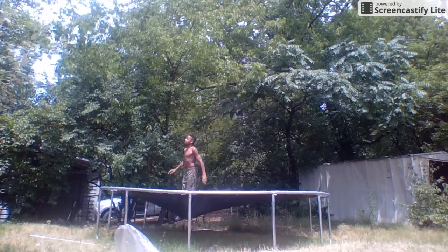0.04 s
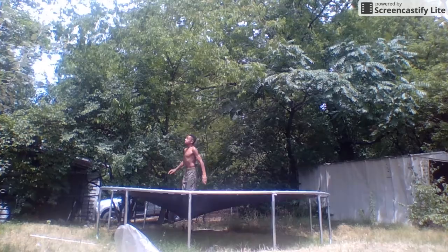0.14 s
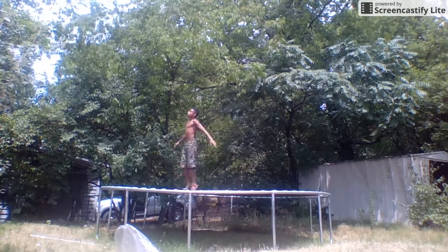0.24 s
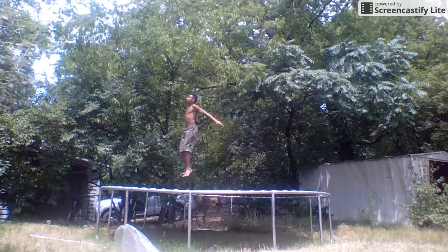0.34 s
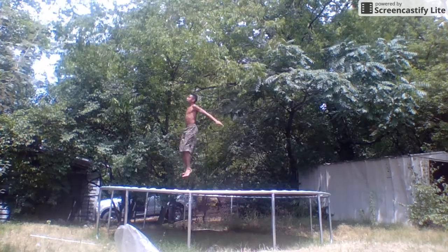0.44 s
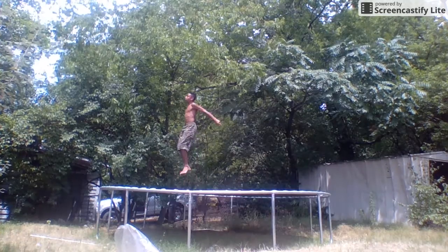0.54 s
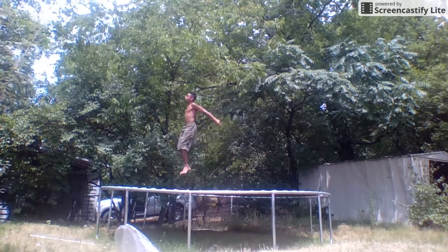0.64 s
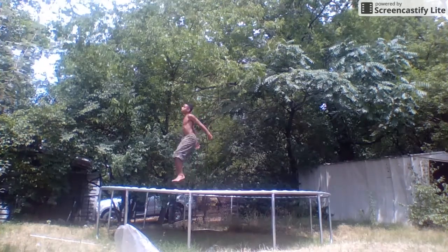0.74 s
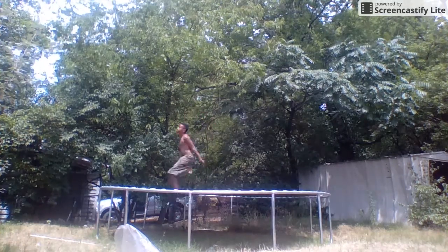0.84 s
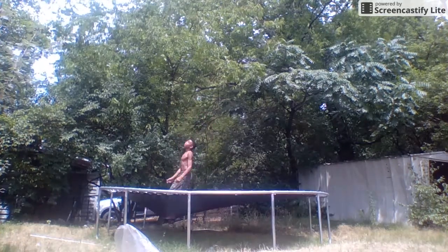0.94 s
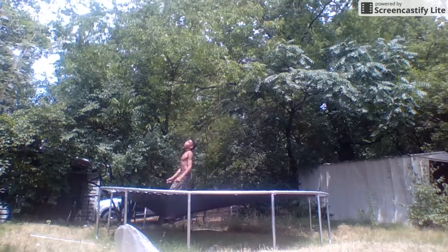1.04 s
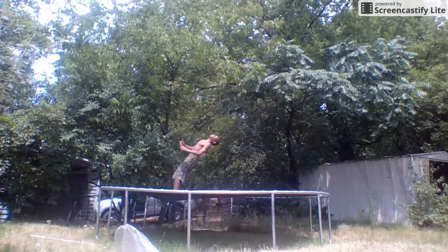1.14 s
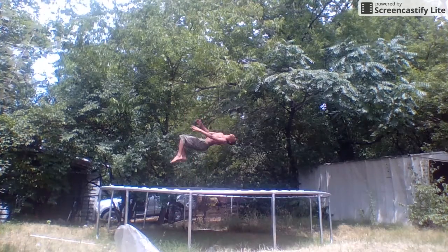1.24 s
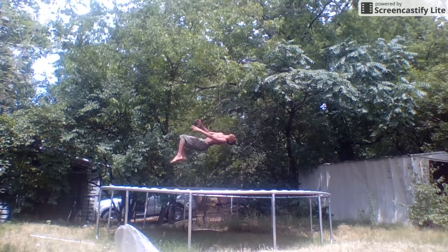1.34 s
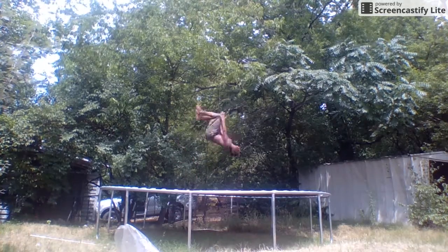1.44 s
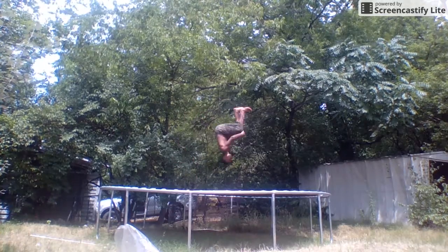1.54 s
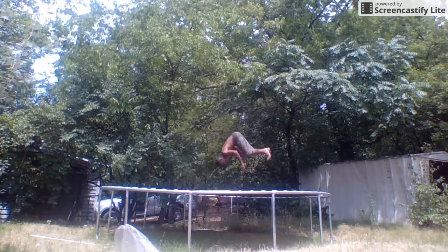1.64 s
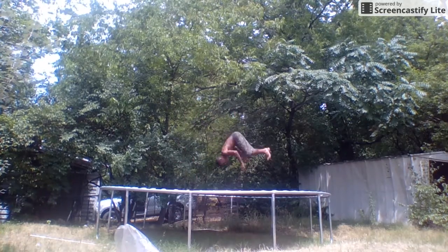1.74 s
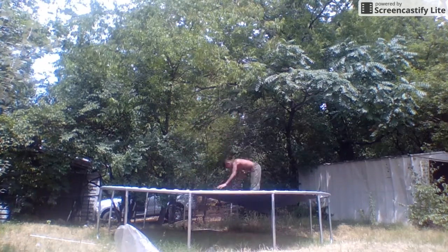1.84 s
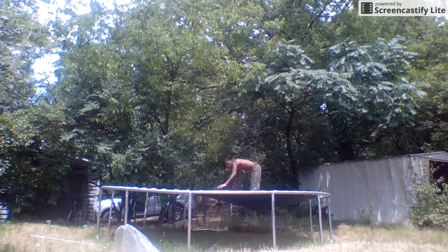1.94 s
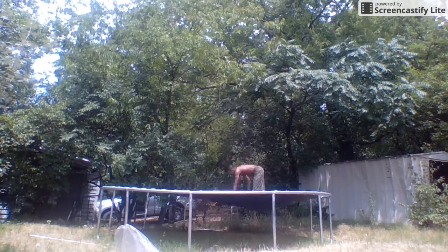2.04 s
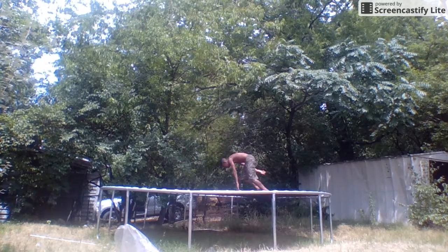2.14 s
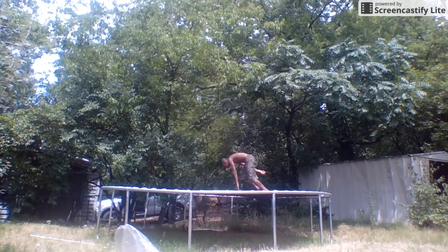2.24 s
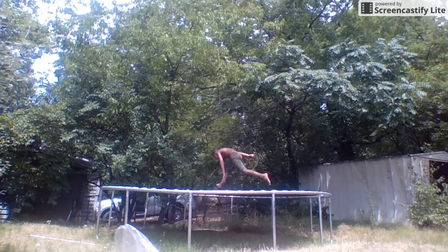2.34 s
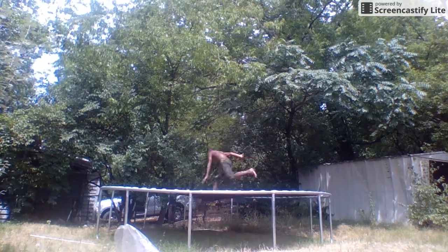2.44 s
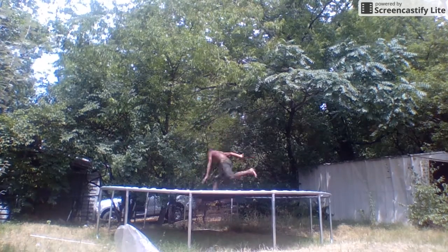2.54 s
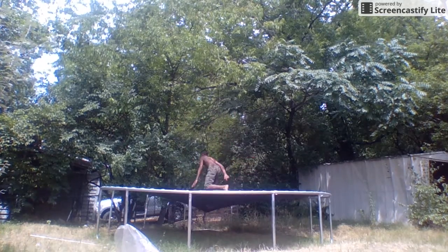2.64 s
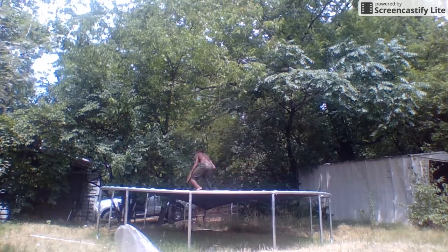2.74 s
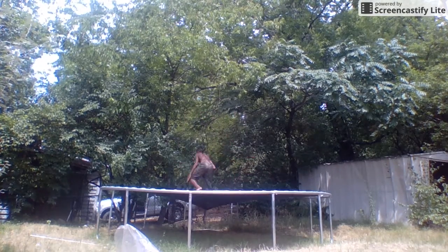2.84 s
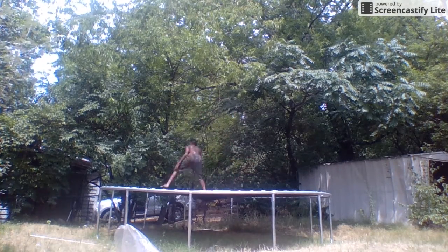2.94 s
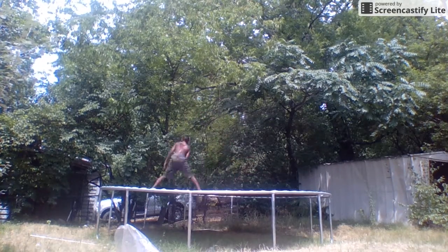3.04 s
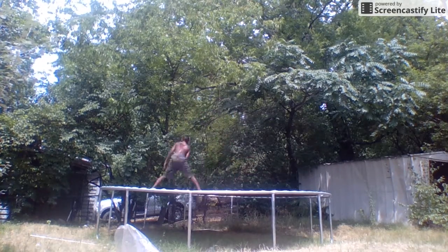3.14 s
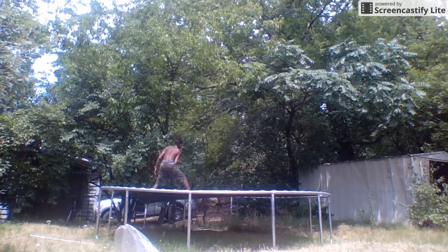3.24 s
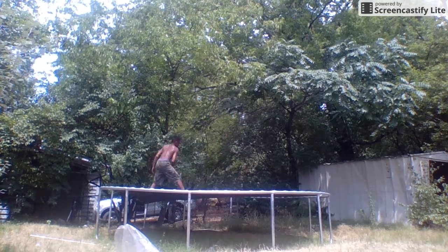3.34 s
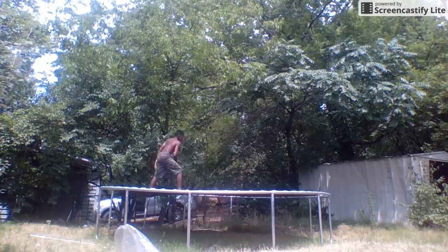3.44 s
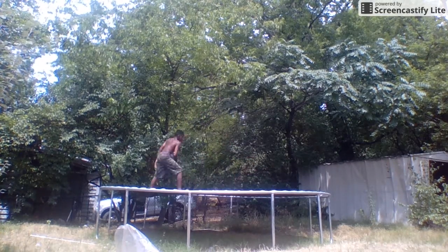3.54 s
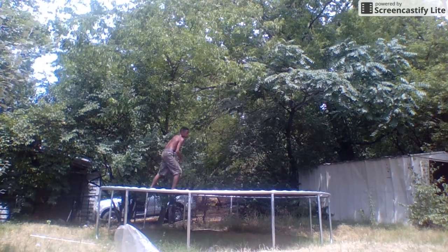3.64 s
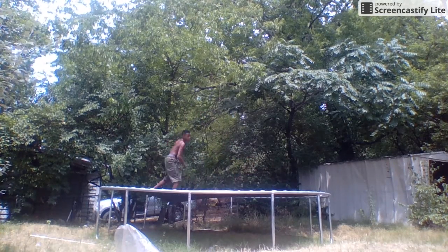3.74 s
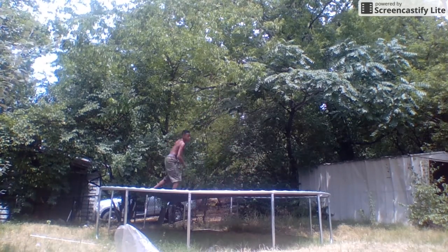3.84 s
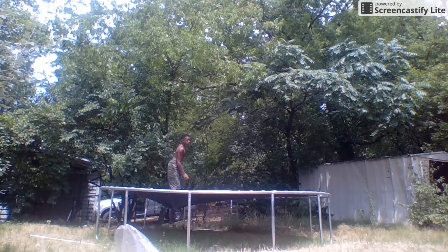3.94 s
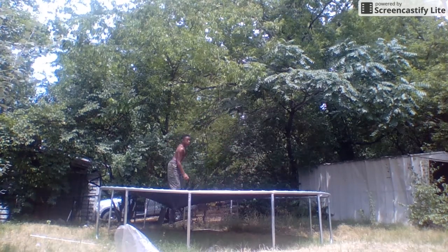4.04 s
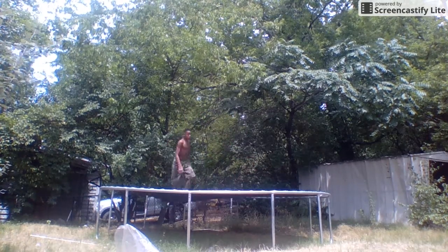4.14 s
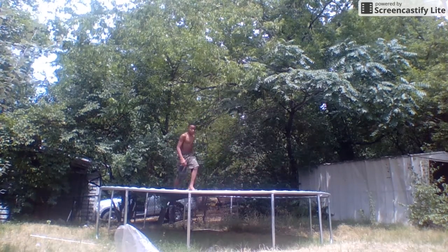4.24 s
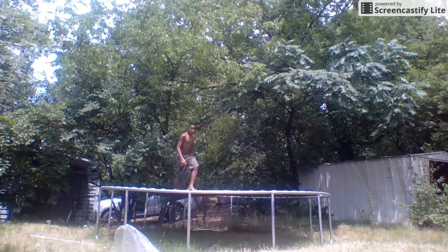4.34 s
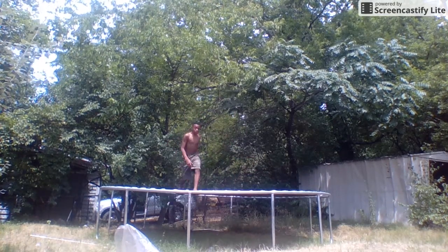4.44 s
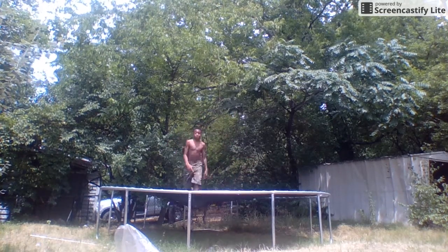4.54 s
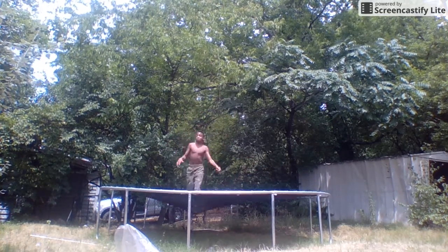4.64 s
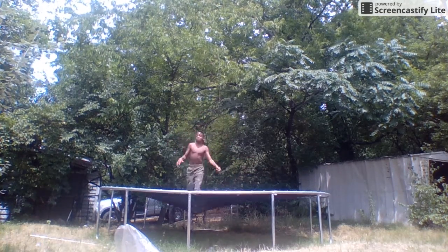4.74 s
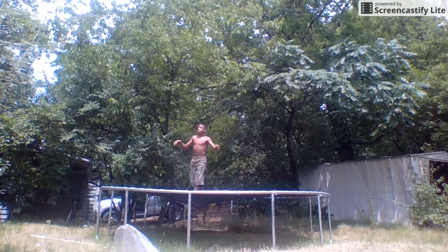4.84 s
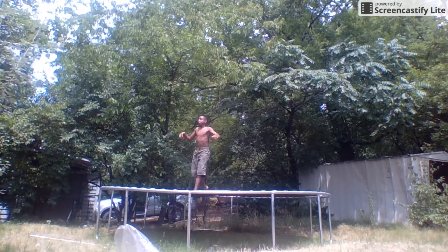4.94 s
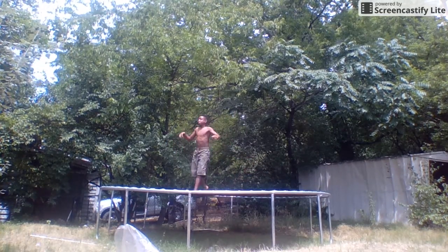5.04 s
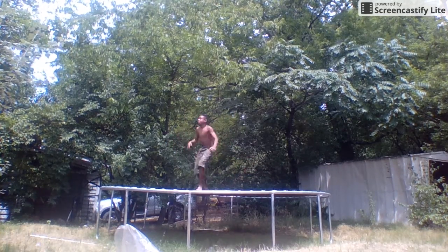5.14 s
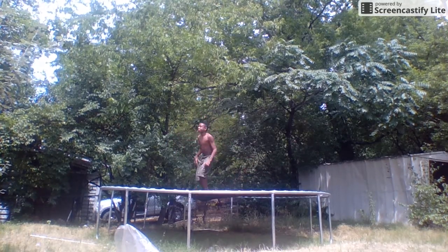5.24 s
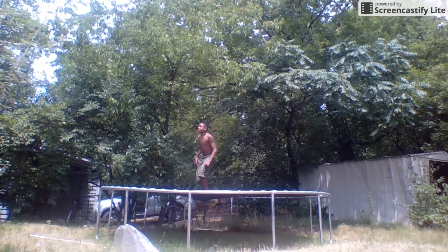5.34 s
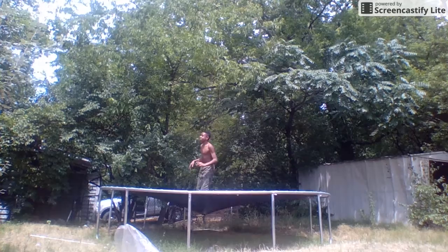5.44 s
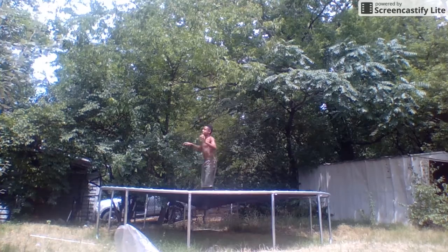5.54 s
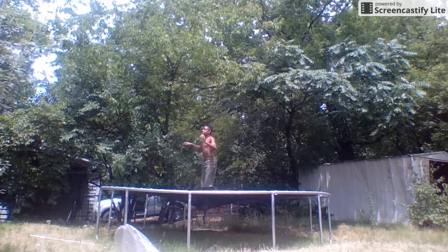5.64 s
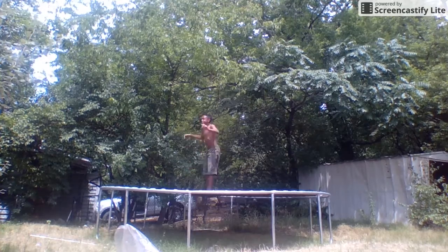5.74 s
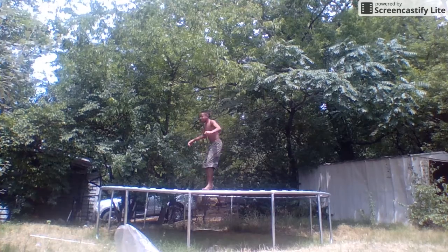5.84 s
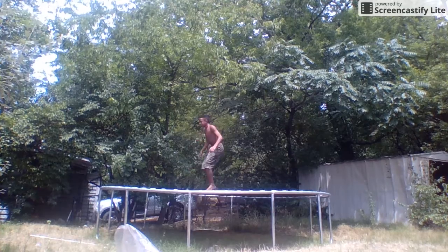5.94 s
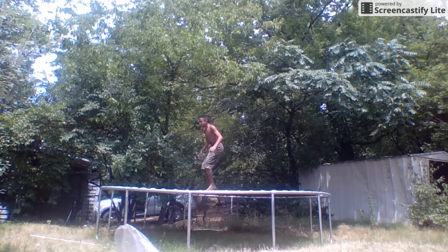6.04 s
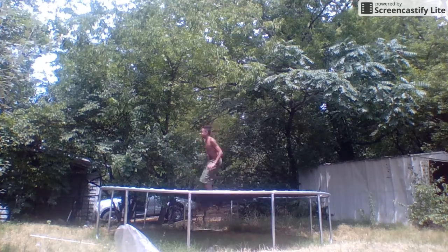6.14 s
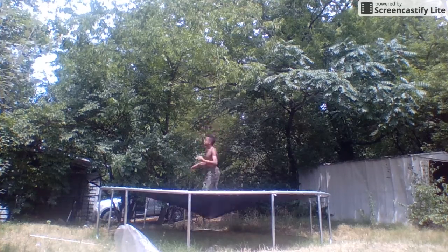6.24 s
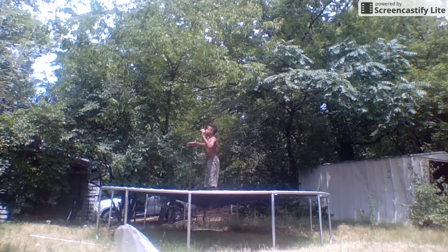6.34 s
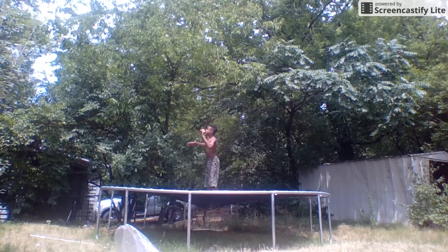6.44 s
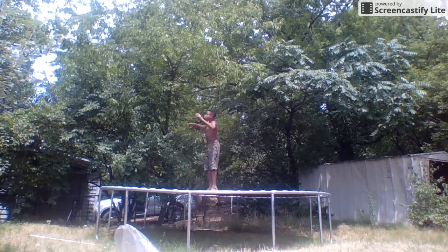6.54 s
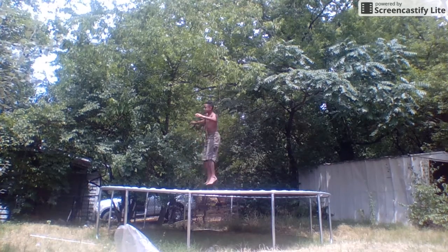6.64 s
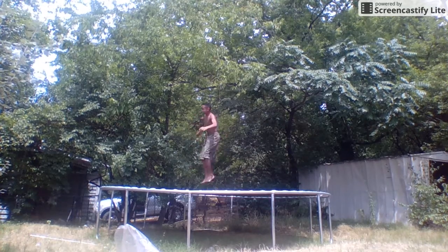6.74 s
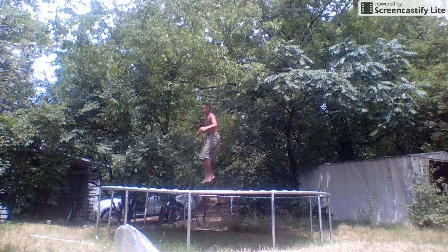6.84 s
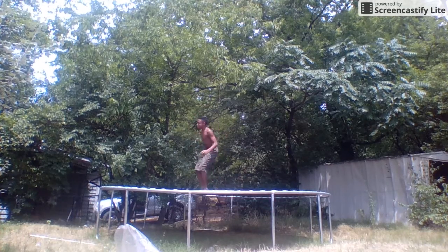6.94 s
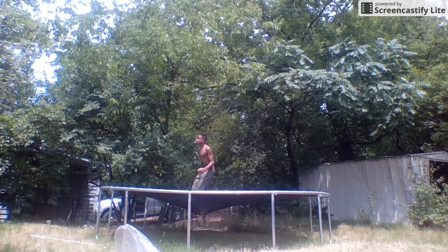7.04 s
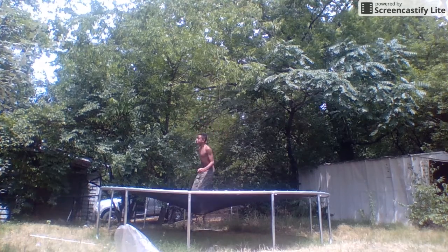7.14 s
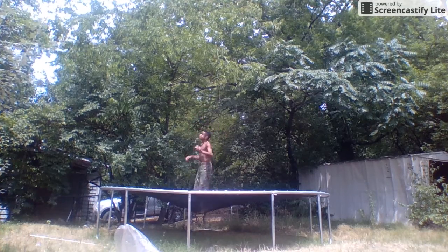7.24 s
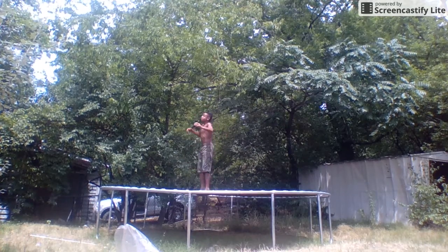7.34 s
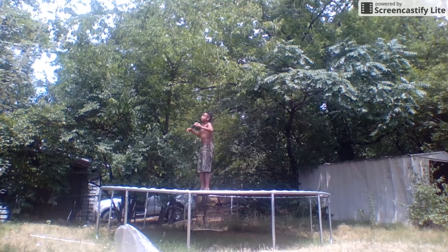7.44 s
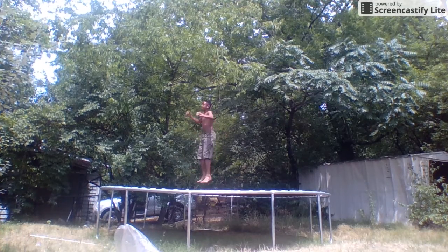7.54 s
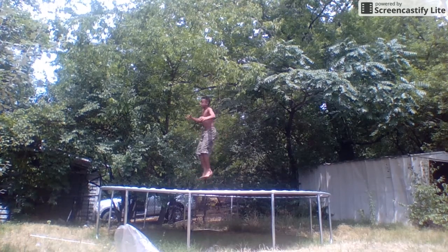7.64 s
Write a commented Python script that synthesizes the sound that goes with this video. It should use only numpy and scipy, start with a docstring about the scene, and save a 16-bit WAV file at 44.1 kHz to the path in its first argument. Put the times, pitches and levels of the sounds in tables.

```python
"""A jumper bounces on a garden trampoline, heard from across the lawn through one bright microphone.
Each landing and take-off drags the mat and stretches the springs: random clicks make a dense rasp and a crunch,
and set tuned modes ringing as coils that chatter on in flight and a steel frame. Hooks creak in pairs of tones.
Below lie low thuds of the mat over light wind, distant traffic and a flatter murmur of leaves, all made from
coloured noise; faint wavering tones colour the murmur."""
import sys
import numpy as np
from scipy import signal
from scipy.fft import rfft, irfft, next_fast_len
from scipy.io import wavfile

SR = 44100
rng = np.random.default_rng(int(sys.argv[2]) if len(sys.argv) > 2 else 0)


def file_out(sig):
    """Save sig as 16-bit WAV at sys.argv[1]."""
    # one column per channel
    cols = np.atleast_2d(sig).T
    # limit, then scale
    lim = np.clip(cols, -1, 1)
    pcm = np.round(lim * 32767).astype(np.int16)
    wavfile.write(sys.argv[1], SR, pcm)


N = 338670   # length in samples
STEP = 40   # slow curves are worked out once in this many samples

# each stretch or recoil of the mat: peak t/s, rasp level/dB, rise/s, fall/s,
# then against the rasp: coil chatter/dB, rim ring/dB, leg scrape/dB
MAT_STROKES = [(0.023, -11, 0.21, 0.11, -5.1, -14, -20.5), (0.232, -14.5, 0.09, 0.13, -6.5, -15, -24),
               (1.007, -8.5, 0.092, 0.12, -6, -14, -24), (1.155, -16.0, 0.06, 0.15, -5.5, -16, -23.5),
               (1.348, -24, 0.075, 0.1, -5, -17, -29), (1.924, -14.3, 0.058, 0.12, -4.5, -20, -19),
               (1.984, -11.5, 0.065, 0.077, -6.5, -12.5, -27), (2.068, -19, 0.073, 0.1, -11, -15, -35),
               (2.156, -17, 0.14, 0.25, -6.5, -16, -23), (2.49, -25, 0.045, 0.13, -7, -20.7, -18),
               (2.617, -17.5, 0.069, 0.15, -7, -18.5, -25.1), (3.019, -33.0, 0.079, 0.15, -4, -21, -16),
               (3.295, -16.5, 0.11, 0.14, -6, -15.5, -16), (3.598, -49.5, 0.07, 0.077, -5, -13, -16),
               (3.688, -43, 0.054, 0.07, -7, -26, -21), (3.983, -34.5, 0.129, 0.094, -3, -10.5, -15),
               (4.269, -51.5, 0.045, 0.099, -11, -21, -9), (4.485, -35.5, 0.09, 0.23, -4.5, -15.5, -21),
               (4.7, -14, 0.082, 0.11, -9, -15.5, -18), (4.895, -33.5, 0.059, 0.14, -6, -13, -14),
               (5.02, -22.5, 0.073, 0.13, -7.5, -22.5, -25.5), (5.223, -41, 0.04, 0.046, -7, -18, -15.6),
               (5.311, -45.5, 0.053, 0.1, -4, -13, -13), (5.462, -13.5, 0.072, 0.105, -7, -16.5, -16.5),
               (5.742, -18, 0.083, 0.14, -9.5, -20, -22.5), (5.902, -37, 0.056, 0.082, -13, -13, -15.1),
               (6.013, -34, 0.044, 0.052, -11.5, -19, -20), (6.107, -54, 0.092, 0.085, -11, -12.1, -14),
               (6.259, -11, 0.071, 0.11, -7.5, -20.5, -19), (6.508, -16.5, 0.069, 0.14, -7, -21, -23.5),
               (6.744, -42.2, 0.059, 0.13, -7, -14, -15), (6.812, -38.5, 0.085, 0.1, -5.5, -14.5, -20),
               (7.055, -50, 0.055, 0.117, -4, -13, -11), (7.144, -10.5, 0.056, 0.14, -7, -24, -17.5),
               (7.191, -11.5, 0.034, 0.058, -7, -18.0, -16), (7.395, -15, 0.055, 0.13, -7.5, -18, -20),
               (7.709, -25.5, 0.089, 0.12, -9.5, -23.6, -23.5)]
# springs left shivering between strokes: t/s, rasp level/dB,
# then against the rasp: coil chatter/dB, rim ring/dB, leg scrape/dB
SPRING_SHIVER = [(0.3, -20.5, -6.5, -29, -35), (0.9, -25.5, -7.5, -44, -48), (1.3, -26, -7.0, -16.7, -33),
                 (1.74, -32, -7.0, -32, -35), (2.8, -30, -9, -24.5, -24.5), (3.41, -32, -8, -20, -29),
                 (3.51, -41, -10, -13, -19), (4.05, -56, -5, -7, -11.5), (4.18, -71.5, -7.5, -7, -6),
                 (4.35, -43.5, -9, -27, -16), (4.9, -38.5, -10, -6.5, -11), (5.3, -49.5, -8, -8, -14.9),
                 (5.9, -45, -9, -11, -18), (6.15, -58, -3, -8.0, -10), (6.6, -36, -10, -2, -16),
                 (6.97, -68, -9.5, -8.0, -11), (7.3, -41, -8, -6, -20), (7.68, -39.5, -8, -23, -20)]
# colour of the fine rasp of weave and coils: f/Hz, relative level/dB
RASP_COLOUR = [(2000, -60), (5500, -34), (7200, -13), (8300, -10), (10500, -7), (11400, -5), (12100, 1),
               (13500, -2), (15200, -5), (16000, -10)]
# colour of the crunch of a hard stretch: f/Hz, relative level/dB
CRUNCH_COLOUR = [(400, -42), (900, -17.5), (1500, -14), (2000, -11), (3300, -0.5), (5000, -2), (6400, 1),
                 (7500, -3.5), (9000, -22)]
# modes (ringing tones) that all springs share: f/Hz, relative level/dB, time to fall 60 dB/s,
# scatter of the copies to either side (share of f)
SPRING_MODES = [(3066, -3, 0.095, 0.039), (3334, -7.5, 0.24, 0.0377), (3594, 0.5, 0.13, 0.043),
                (4036, 0, 0.13, 0.0365), (4487, -5, 0.1, 0.0496), (4910, -3, 0.16, 0.0234),
                (5320, 1, 0.086, 0.0385), (5790, 0.5, 0.084, 0.0363), (6323, 5.5, 0.14, 0.0226),
                (6540, 1, 0.088, 0.0182), (6820, 1.5, 0.26, 0.0286), (7470, -5, 0.13, .04),
                (11960, -1.5, 0.16, 0.0216), (12010, 0.5, 0.087, 0.0298)]
# free shivering favours other spring modes than a stretch does: added to each mode/dB
SHIVER_FAVOURS_DB = [-0.5, -2.5, -3, 2, 8, 7, 0, 1.5, -7, -7.5, 2.5, -7, -1, -2.5]
# modes of the steel rim: f/Hz, relative level/dB, time to fall 60 dB/s, scatter (share of f)
RIM_MODES = [(2150, -4.5, 0.12, 0.033), (2270, -3.5, 0.28, 0.0359), (2535, -1, 0.18, 0.0442),
             (2807, -8, 0.084, 0.0336)]
# modes of the steel legs: f/Hz, relative level/dB, time to fall 60 dB/s, scatter (share of f)
LEG_MODES = [(870, -15, 0.17, 0.073), (1196, -7, 0.079, 0.104), (1459, -4.5, 0.082, 0.058),
             (1605, -3, 0.17, 0.045), (1802, -2.5, 0.1, 0.046)]
# single hooks and springs that sing out: t/s, level/dB, f/Hz, length/s
HOOK_CREAKS = [(0.208, -36, 866, 0.053), (0.41, -40, 2130, 0.064), (0.693, -38.5, 4960, 0.22),
               (1.111, -36, 870, 0.088), (1.233, -46, 2210, 0.31), (1.75, -49, 4940, 0.13),
               (2.347, -44, 4870, 0.15), (2.364, -43, 3670, 0.062), (2.694, -41, 2600, 0.057),
               (2.996, -45, 4860, 0.28), (3.183, -51, 2150, 0.053), (4.658, -28, 4050, 0.087),
               (4.845, -48, 4250, 0.07), (4.92, -41.5, 4010, 0.087), (5.366, -44, 1615, 0.1),
               (5.634, -52, 4350, 0.05), (5.678, -38, 1640, 0.14), (5.855, -46, 6480, 0.087),
               (6.17, -33, 1603, 0.08), (6.19, -45, 2220, 0.1), (6.45, -38, 1580, 0.17),
               (6.482, -36, 848, 0.07), (6.862, -42, 800, 0.09), (7.02, -41.5, 792, 0.19),
               (7.237, -38, 6620, 0.048), (7.317, -41, 2120, 0.17), (7.323, -38, 1550, 0.12),
               (7.458, -40, 2230, 0.07), (7.555, -49, 2270, 0.096)]
# surroundings: t/s, low thuds and wind level/dB, traffic drone level/dB, murmur of leaves level/dB
YARD_LEVELS = [(0.0, -58, -43.5, -53), (0.66, -57.5, -49, -52), (3.23, -52, -50, -54),
               (3.44, -47.5, -48, -52), (3.68, -53, -55, -55), (5.8, -58, -52.5, -53.5),
               (6.25, -46, -51.5, -52.5), (6.91, -64, -45, -55.5), (7.25, -44.5, -44.5, -49.5),
               (7.68, -53, -48, -52)]
# the low end swells briefly: onset t/s, low thuds level/dB, drone level/dB
LOW_BUMPS = [(.463, -55, -43), (1.02, -49, -54), (1.953, -40.5, -45), (2.65, -46, -46), (3.264, -43, -47),
             (4.0, -48, -56), (4.377, -42, -52.5), (4.755, -50, -49), (4.96, -46.5, -51), (5.636, -52, -49),
             (5.8, -49, -51), (6.06, -42.5, -46.5), (6.656, -42, -42), (6.816, -55, -45),
             (7.091, -50, -40.5), (7.401, -47, -36.5), (7.6, -39.5, -41)]
# colour of the low thuds of the mat and the light wind: f/Hz, relative level/dB
THUD_COLOUR = [(12, -35), (25, -12), (60, 0.5), (85, 0.5), (110, -22), (300, -75)]
# colour of the traffic drone: f/Hz, relative level/dB
DRONE_COLOUR = [(60, -48), (95, -7.5), (134, 0), (165, -6.5), (250, -12.5), (400, -32.5), (600, -52.5)]
# colour of the murmur of leaves: f/Hz, relative level/dB
MURMUR_COLOUR = [(200, -3), (350, -3), (600, -0.5), (900, 1), (1400, -5), (2000, -8), (4000, -18.5),
                 (12000, -16), (16000, -32.5)]
# faint wavering tones in the murmur: f/Hz, relative level/dB, time to fall 60 dB/s, scatter (share of f)
WARBLE_MODES = [(279.2, 1, 0.19, 0.198), (480.4, 0, 0.13, 0.255), (804, 1, 0.12, 0.195),
                (1133, -0.5, 0.11, 0.157)]

SWELL_DB = 20   # a lone swell lies this far under its peak one rise before and one fall after it
RISE_POWER, FALL_POWER = 2.53, 2.04   # how squarely a swell rises and falls
RIM_LINGERS, LEGS_LINGER = 1.19, 0.8   # their fall as a multiple of the stroke's
HELD = 0.63   # share of the level in dB that acts by damping the ringing; the rest sets how hard it is struck
SPELL_S = 0.12   # how long a mode stays equally busy
BUMP_DELAY_S, BUMP_RISE_S, BUMP_FALL_S = 0.023, 0.049, 0.13   # onset to peak, then the swell's two sides
CUTOFF_HZ = 15930   # top of the microphone's sound


def trampoline():
    """One motion drives the rasp, the coils and the frame; hard stretches bury the ringing in crunch."""
    rasp_db, coil_db, rim_db, legs_db, shiver_share = motion()
    rasp = from_db(rasp_db + 1.0 * drift(40.0)) * coloured(grains(14000.0, 1.4), RASP_COLOUR)
    # crunch grows faster than the chatter as the rasp gets louder
    hardness_db = 0.25 * (rasp_db + 12)
    crunch = from_db(coil_db + hardness_db - 2.5) * coloured(grains(5000.0, 1.8), CRUNCH_COLOUR)
    chatter = struck(SPRING_MODES, coil_db, 12000.0, 3.0, family_db=3.0, single_db=3.5, count=7,
                     favours_db=SHIVER_FAVOURS_DB, share=shiver_share)
    rim = struck(RIM_MODES, rim_db, 3000.0, 2.3, family_db=5.0, single_db=4.0, count=8)
    legs = struck(LEG_MODES, legs_db, 3000.0, 2.9, family_db=5.5, single_db=3.0, count=6)
    return rasp + crunch + chatter + rim + legs


def motion():
    """Levels of rasp, coils, rim and legs as strokes ride over the shiver; and the shiver's share of the coils."""
    shiver_db, coil_db, rim_db, legs_db = in_time(SPRING_SHIVER)
    peak_s, stroke_db, rise, fall, coil_hit_db, rim_hit_db, legs_hit_db = np.transpose(MAT_STROKES)
    rasp = swells(shiver_db, peak_s, stroke_db, rise, fall)
    coils = swells(shiver_db + coil_db, peak_s, stroke_db + coil_hit_db, rise, fall)
    rim = swells(shiver_db + rim_db, peak_s, stroke_db + rim_hit_db, rise, RIM_LINGERS * fall)
    legs = swells(shiver_db + legs_db, peak_s, stroke_db + legs_hit_db, rise, LEGS_LINGER * fall)
    shiver_share = from_db(2 * (shiver_db + coil_db - coils))   # share of power
    return rasp, coils, rim, legs, shiver_share


def struck(modes, force_db, per_s, spread_db, family_db, single_db, count, favours_db=0, share=0):
    """Random contacts ring `count` copies of each mode; families and single copies are busy or idle in spells."""
    hz, level_db, t60, scatter = np.repeat(modes, count, axis=0).T
    # copies fill their band loosely
    place = (np.arange(len(hz)) % count + rng.random(len(hz))) / count
    hz = hz * (1 + scatter * (2 * place - 1))
    # each contact goes to one copy
    dealt = rng.integers(0, len(hz), N)
    spell = round(SPELL_S * SR)
    family = np.repeat(rng.standard_normal((len(modes), N // spell + 1)), count, axis=0)
    single = rng.standard_normal(family.shape)
    busy = rms_one(from_db(family_db * family + single_db * single))
    clicks = from_db((1 - HELD) * force_db) * grains(per_s, spread_db)
    clicks = clicks * busy[dealt, np.arange(N) // spell]
    favours = np.repeat(favours_db + np.zeros(len(modes)), count)
    clicks = clicks * from_db(share * favours[dealt])
    rings = np.zeros(N)
    for k in range(len(hz)):
        rings += from_db(level_db[k]) * ring(clicks * (dealt == k), hz[k], t60[k])
    mode_loudness = np.sqrt(np.mean(from_db(2 * level_db)))
    return from_db(HELD * force_db) * rings / mode_loudness


def creaks():
    """A hook slips unevenly for a moment and sounds a close pair of tones."""
    out, slips = np.zeros(N), grains(1200.0, 1.0)
    for s, level_db, hz, length in HOOK_CREAKS:
        # 0.3 s more lets the tones die away
        span = slice(round(s * SR), round((s + length + 0.3) * SR))
        age = np.clip(np.arange(len(slips[span])) / SR / length, 0, 1)
        push = slips[span] * np.sin(np.pi * age ** 0.5)
        lower = ring(push, hz * (1 - 0.006), 0.073)
        upper = ring(push, hz * (1 + 0.0082), 0.11)
        out[span] += from_db(level_db) * (lower - upper)
    return out


def yard():
    """Low thuds of the mat over light wind, a traffic drone and a flatter murmur, all coloured noise; faint tones."""
    thuds_db, drone_db, murmur_db = in_time(YARD_LEVELS)
    # the low end swells briefly
    onset_s, thuds_bump_db, drone_bump_db = np.transpose(LOW_BUMPS)
    peak_s = onset_s + BUMP_DELAY_S
    thuds_db = swells(thuds_db, peak_s, thuds_bump_db, BUMP_RISE_S, BUMP_FALL_S)
    drone_db = swells(drone_db, peak_s, drone_bump_db, BUMP_RISE_S, BUMP_FALL_S)
    thuds = from_db(thuds_db + 2.4 * drift(4.6)) * coloured(rng.standard_normal(N), THUD_COLOUR)
    drone = from_db(drone_db + 1.5 * drift(8.0)) * coloured(rng.standard_normal(N), DRONE_COLOUR)
    murmur = from_db(murmur_db + 0.29 * drift(3.4)) * coloured(rng.standard_normal(N), MURMUR_COLOUR)
    warble = struck(WARBLE_MODES, murmur_db, 1500.0, 1.8, family_db=1.5, single_db=6.5, count=5)
    return thuds + drone + murmur + warble


def swells(under_db, peak_s, level_db, rise_s, fall_s):
    """Rounded swells of level in dB, their power added to that of the level under them."""
    peak_s, level_db, rise_s, fall_s = [np.reshape(v, (-1, 1)) for v in (peak_s, level_db, rise_s, fall_s)]
    since = np.arange(0, N + STEP, STEP) / SR - peak_s
    width = np.where(since < 0, rise_s, fall_s)
    bend = np.where(since < 0, RISE_POWER, FALL_POWER)
    swell_db = level_db - SWELL_DB * np.abs(since / width) ** bend
    power = from_db(2 * swell_db).sum(axis=0)   # twice the dB gives power
    power = np.interp(np.arange(N) / STEP, np.arange(len(power)), power)
    return 10 * np.log10(from_db(2 * under_db) + power)


def ring(push, hz, t60):
    """A mode rings at hz and falls 60 dB in t60 seconds; steady noise of rms 1 settles at rms 1."""
    r, w = from_db(-60 / (t60 * SR)), 2 * np.pi * hz / SR
    gain = np.sin(w) * np.sqrt(2 * (1 - r * r))
    return signal.lfilter([0, gain], [1, -2 * r * np.cos(w), r * r], push + 1e-18)


def grains(per_s, spread_db):
    """About per_s random clicks a second, of uneven size and either sign; rms 1."""
    sizes = from_db(spread_db * np.minimum(rng.exponential(1, N), 5)) * rng.choice([-1, 1], N)
    return rms_one(sizes * (rng.random(N) < per_s / SR))


def coloured(x, spectrum):
    """Give a flat-spectrum signal the colour of a table; rms 1."""
    size = next_fast_len(N)
    hz, level_db = np.transpose(spectrum)
    log_hz = np.log(np.arange(1, size // 2 + 2) * SR / size)
    gain = from_db(np.interp(log_hz, np.log(hz), level_db))
    return rms_one(irfft(rfft(x, size) * gain, size)[:N])


def drift(rate_hz):
    """Slow random wander of rms 1: noise smoothed twice above rate_hz."""
    r = np.exp(-2 * np.pi * rate_hz * STEP / SR)
    noise = rng.standard_normal(N // STEP + 2002)
    slow = signal.lfilter([1], [1, -2 * r, r * r], noise)[2000:]   # skip the filter's start
    return np.interp(np.arange(N) / STEP, np.arange(len(slow)), rms_one(slow))


def in_time(rows):
    """Join the points of a level table by straight lines, one value a sample."""
    s, *columns = np.transpose(rows)
    return [np.interp(np.arange(N) / SR, s, c) for c in columns]


def rms_one(x):
    """Scale to an average strength (rms) of 1."""
    return x / np.sqrt(np.mean(x ** 2) + 1e-20)


def from_db(db):
    """Decibels to gain."""
    return 10 ** (np.asarray(db) / 20)


def scene():
    """One microphone feeds both channels."""
    return np.tile(trampoline() + creaks() + yard(), (2, 1))


def record(dry):
    """Any peak beyond full scale is clipped, then a steep filter cuts the top."""
    cut = signal.ellip(12, 0.3, 75, CUTOFF_HZ, fs=SR, output="sos")
    return signal.sosfilt(cut, np.clip(dry, -1, 1))


dry = scene()
out = record(dry)
file_out(out)
```